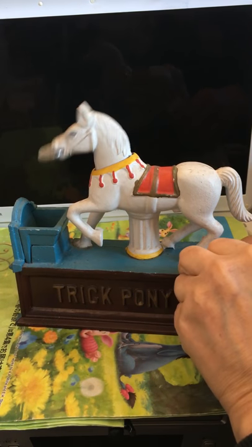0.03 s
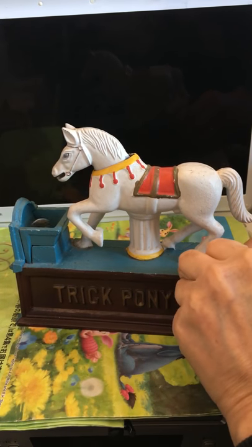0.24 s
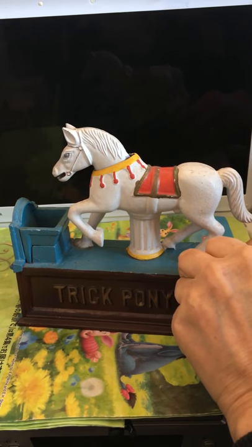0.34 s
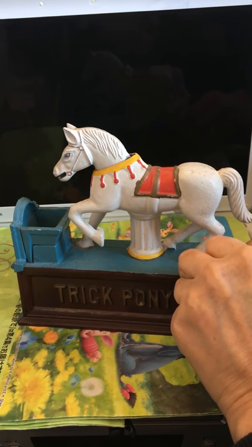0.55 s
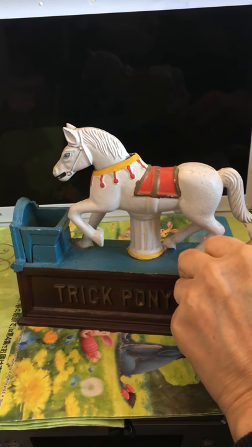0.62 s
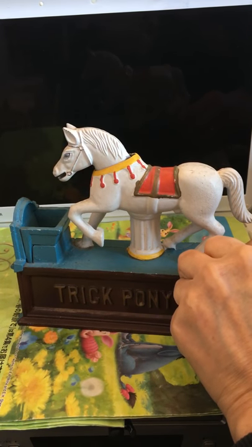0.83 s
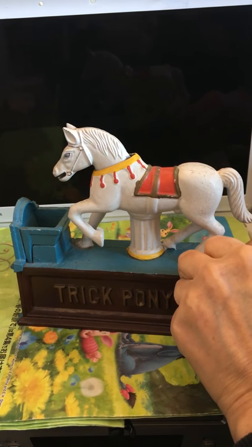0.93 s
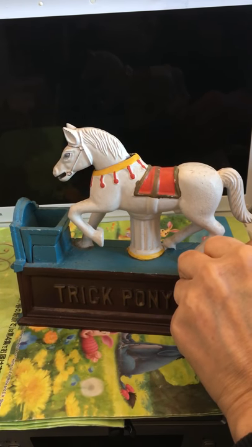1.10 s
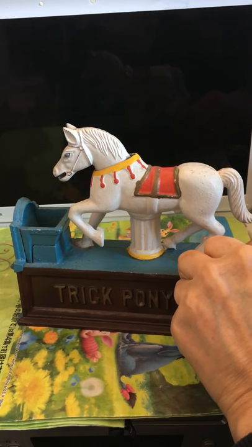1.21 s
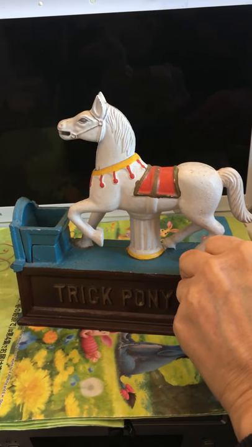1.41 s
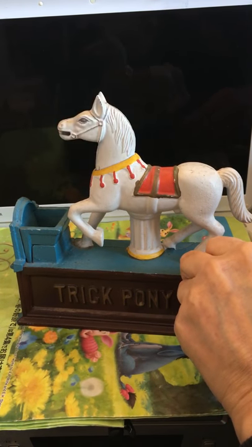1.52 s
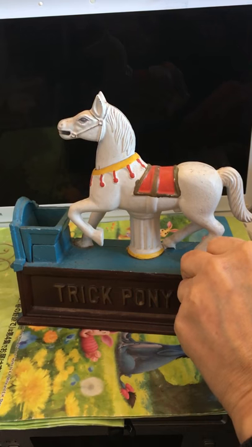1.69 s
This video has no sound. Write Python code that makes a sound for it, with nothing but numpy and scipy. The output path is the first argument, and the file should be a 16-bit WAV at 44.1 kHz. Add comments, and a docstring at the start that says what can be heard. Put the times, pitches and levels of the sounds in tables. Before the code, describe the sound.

A cast-iron mechanical coin bank scrapes and clacks, and a coin rings and rattles down inside. After a pause, the mechanism slams back, leaving a spring ringing. It is heard close up in a quiet room.

```python
"""A cast-iron mechanical coin bank is worked by hand, close by in a quiet, faintly humming room.
First the pony's head scrapes down and clacks against its stop, shaking a spring.
The coin drops, rings and rattles down the chute into the base. A soft rub on the iron fills the pause.
Last, the head scrapes back up and slams home, leaving the spring ringing."""
import sys
import numpy as np
from scipy import signal
from scipy.fft import rfft, irfft
from scipy.io import wavfile
from scipy.ndimage import uniform_filter1d

SR = 44100
rng = np.random.default_rng(int(sys.argv[2]) if len(sys.argv) > 2 else 0)


def wrap_up_sound(samples):
    """Save the sound to the file named by the first command line argument, as 16-bit audio."""
    columns = np.atleast_2d(samples).T
    # keep every value between -1 and 1, then stretch to whole-number steps
    tamed = np.clip(columns, -1, 1)
    steps = np.round(tamed * 32767).astype(np.int16)
    wavfile.write(sys.argv[1], SR, steps)


N = 77175
TIME = np.arange(N) / SR

# A "colour" says how strong a noise is at each pitch. A "mode" is one note that an object rings at.
# t60 is the time a sound takes to fade by 60 dB.
# the room's low rumble: pitch_hz, level_db
RUMBLE_COLOUR = [(15, -40.5), (25, -16.5), (49, -7), (76, -14), (108, -0.5), (127, -19.5), (141, -14),
                 (463, -29.5), (641, -35), (1190, -42), (1290, -24), (1440, -57), (16000, -69)]
# an appliance's hum: pitch_hz, level_db
HUM_TONES = [(54, -64.5), (107, -66.5)]
# iron parts knock together: start_s, level_db, peak_hz, peak_db, casting_ring_db
IRON_CLACKS = [(0.0435, -58, 4460, 11, -62), (0.088, -50, 3200, 16, -55), (0.1178, -49.5, 1490, 15, -51),
               (0.1283, -51.5, 4550, 20, -59), (0.1442, -43, 1000, 25.5, -47.5),
               (0.2176, -25, 1400, 1, -33), (.228, -20, 1400, -24, -27), (.2395, -19.5, 3960, 7.5, -46),
               (0.2548, -14.5, 4940, 10.5, -35), (.375, -43.5, 1204, 12, -45.5),
               (0.414, -44.5, 4150, 9, -51.5), (0.856, -57, 1300, 9, -62), (1.386, -32, 2990, 14, -23),
               (1.4002, -28.5, 2880, -8, -42), (1.458, -24, 1070, 29, -38), (1.466, -15.5, 9100, 6, -21),
               (1.4711, -17.5, 930, 7, -33.5), (1.477, -19.5, 2970, 16.5, -51), (1.49, -53, 6000, -8, -77)]
# the pivot and linkage scrape as the head goes down, then up: time_s, level_db
DOWN_LEVELS = [(.05, -70.5), (.11, -67.5), (.135, -42.5), (.17, -50.5), (.2, -41.5), (.214, -35),
               (.225, -23.5), (.245, -38), (.275, -38.5), (.31, -49.5), (.35, -63.5), (.44, -57)]
UP_LEVELS = [(1.362, -74), (1.375, -48.5), (1.387, -27.5), (1.409, -34), (1.425, -33.5), (1.45, -28),
             (1.47, -25.5), (1.493, -45), (1.519, -50)]
# grit and dense ringing of the iron, down and up: pitch_hz, level_db
DOWN_IRON_COLOUR = [(120, -54.5), (200, -9.5), (366, -25.5), (986, -8), (1140, -8.5), (1270, 1),
                    (1940, -10.5), (3130, -8), (8580, -16), (10700, -25.5), (12800, -16), (16000, -36)]
UP_IRON_COLOUR = [(130, -56.5), (220, -45), (315, -3.5), (549, -24), (601, -10.5), (1250, -2.5), (1890, -5),
                  (2960, -6.5), (3610, -7.5), (6180, -9), (16000, -19.5)]
# notes that the scraping sets off, down and up: pitch_hz, level_db, t60_s
DOWN_MODES = [(360, -12, 0.12), (1288, -3, 0.064), (1536, -6.5, 0.031), (3013, -4.5, 0.036)]
UP_MODES = [(315, -14, 0.24), (393, -10, 0.061), (1346, -0.5, 0.049), (2960, 3, 0.058), (3260, -12, 0.047)]
# modes of the casting (the iron body), spring, chute and coin: pitch_hz
CASTING_PITCHES = [308, 392, 965, 1140, 1295, 1345, 1523, 1660, 1765, 2468, 2893, 3092, 3309, 4555]
SPRING_PITCHES = [1287, 1943, 2261, 2476, 2643]
CHUTE_PITCHES = [4150, 4214, 4250, 4430, 5222, 6146, 6368, 9049, 11680]
COIN_PITCHES = [13168, 13275, 13930, 14076]
# strength and fade of those modes, in the same order: level_db, t60_s
CASTING_MODES = [(-25, .15), (-25, 0.142), (-3.5, 0.025), (-8, 0.035), (-2.5, 0.061), (-2.5, .06),
                 (-9, .08), (-13.5, .06), (-11.5, 0.057), (-15.5, 0.19), (-20, 0.19), (-13, 0.057),
                 (-2, 0.046), (-6, 0.067)]
SPRING_MODES = [(-40.5, 2.4), (-15, 0.49), (-4, 0.41), (-3, 0.26), (-10, 0.18)]
CHUTE_MODES = [(-3, 0.058), (0, 0.033), (-7.5, 0.034), (-11, 0.061), (-12, 0.05), (-3, 0.034), (-18, 0.047),
               (-11.5, 0.0395), (-16.5, 0.0357)]
COIN_MODES = [(-2, 0.099), (-17, 0.061), (-13, 0.21), (1.5, 0.32)]
# the spring is shaken: start_s, level_db
SPRING_SHAKES = [(.228, -38.5), (1.471, -33)]
# the coin strikes: start_s, level_db, peak_hz, peak_db, casting_ring_db, chute_ring_db, coin_ring_db
COIN_BOUNCES = [(0.2707, -16.5, 13200, 8.5, -40, -39, -23), (.288, -14.5, 4460, 7, -26.5, -14, -28),
                (0.3054, -27, 4200, 15, -37, -24, -20.5), (0.451, -18, 8860, 17, -39, -34.5, -33),
                (.479, -29.5, 9000, -4.5, -47.5, -46.5, -30.5), (0.4819, -36, 12000, 7, -45, -39.5, -40.5),
                (.49, -29.5, 4310, 4, -43, -29, -37.5), (0.5162, -24, 5980, -14.5, -39, -17.5, -36.5),
                (0.5248, -30, 12470, 4, -47.5, -35.5, -28.5), (0.558, -31, 5980, -5.5, -64, -27, -42.5),
                (0.568, -21, 7500, -3.5, -43.5, -40, -42.5), (0.5767, -17, 3035, 10.5, -35, -33.5, -26.5),
                (.608, -17, 9550, 14.5, -49, -54, -42.5), (0.6251, -13, 4820, 17, -42.5, -25, -50.5),
                (0.646, -32.5, 5050, -7, -62, -49.5, -45), (0.7024, -44, 4470, 6.5, -50, -50, -74)]
# the clatter of a coin strike: pitch_hz, level_db
BOUNCE_COLOUR = [(180, -65.5), (300, -32.5), (1140, -14), (1410, -14), (3890, -8.5), (4230, -1.5),
                 (7320, -6.5), (9710, -7), (12500, -10.5), (14200, -4.5), (16000, -29)]
# the coin comes to lie against the iron, which chokes its ringing: time_s
CHOKE_TIMES = [.338, .612]
# a soft rub on the casting: time_s, level_db
RUB_LEVELS = [(.905, -65), (.93, -47), (.955, -51.5), (.985, -62), (1.03, -76.5)]
# the grit of that rub: pitch_hz, level_db
RUB_GRIT_COLOUR = [(76, -36), (130, 6), (198, 1.5), (625, -18), (974, -9), (1100, -16), (3750, -10),
                   (4320, -18.5), (9100, -8), (16000, -19)]
# notes that the rub sets off: pitch_hz, level_db, t60_s
RUB_MODES = [(193, -3.5, 0.073), (973, 0.5, 0.067)]
# the microphone's hiss: pitch_hz, level_db
HISS_COLOUR = [(240, -24.5), (400, -4.5), (1290, -10), (1790, -8), (2320, -7.5), (2930, -10.5),
               (8760, -15.5), (16000, -19.5)]


def from_db(db):
    """Turn decibels into a number to multiply by."""
    return 10 ** (np.asarray(db) / 20)


def unit_power(x):
    """Scale a sound to an average power of 1."""
    return x / np.sqrt(np.mean(x ** 2) + 1e-20)


def decay(t60_s, size):
    """A fade that loses 60 dB every t60_s seconds."""
    return np.exp(-np.log(1000) * TIME[:size] / t60_s)


def noise(colour, size=N, peak_hz=1000, peak_db=0, peak_octaves=0.2):
    """Noise of a given colour, with an optional boost around one pitch."""
    hz, db = np.transpose(colour)
    octave = np.log2(np.fft.rfftfreq(size, 1 / SR) + 1)
    shape_db = np.interp(octave, np.log2(hz), db)
    shape_db -= 20 * np.maximum(np.log2(hz[0]) - octave, 0)  # falls away below the lowest pitch
    shape_db += peak_db * np.exp(-.5 * ((octave - np.log2(peak_hz)) / peak_octaves) ** 2)
    return unit_power(irfft(rfft(rng.standard_normal(size)) * from_db(shape_db), size))


def background(rumble_db=-58):
    """Low room rumble and an appliance's hum, there from the start."""
    hum = sum(from_db(db) * np.sqrt(2) * np.sin(2 * np.pi * (hz * TIME + rng.random()))
              for hz, db in HUM_TONES)
    return from_db(rumble_db) * noise(RUMBLE_COLOUR) + hum


def clatter(hits, colour, t60_s, contact_s=0.00048, crack_s=0.00086, size=8192):
    """Each hit is a sharp crack and a burst of so many notes that they blur into noise."""
    out = np.zeros(N + size)
    rise = 1 - np.exp(-TIME[:size] / contact_s)
    crack = 1 + 0.53 * np.exp(-TIME[:size] / crack_s)
    fade = rise * crack * decay(t60_s, size)
    for start_s, db, peak_hz, peak_db in hits:
        start = int(start_s * SR)
        out[start:start + size] += from_db(db) * fade * noise(colour, size, peak_hz, peak_db)
    return out[:N]


def ring(force, hz, t60_s):
    """One mode: each push starts a fading sine wave."""
    shrink = np.exp(-np.log(1000) / (t60_s * SR))
    turn = 2 * np.pi * hz / SR
    return signal.lfilter([0, np.sin(turn)], [1, -2 * shrink * np.cos(turn), shrink ** 2], force + 1e-18)


def struck(pitches, modes, times_s, levels_db, scatter_db=1.5):
    """Every blow rings every mode of an object, each with a slightly different strength."""
    out = np.zeros(N)
    for k, (hz, (db, t60_s)) in enumerate(zip(pitches, modes)):
        blows_db = levels_db + db + scatter_db * rng.standard_normal(len(times_s))
        force = np.zeros(N)
        force[(times_s * SR).astype(int)] = from_db(blows_db)
        out += (-1) ** k * ring(force, hz, t60_s)  # every other mode starts the opposite way
    return out


def friction(levels, colour, modes, ring_db, slips_per_s=1500, spread_db=1.5, bright_from_db=-32.5):
    """Sliding is many tiny slips: they make grit, brighter with effort, and set a few notes ringing."""
    times_s, levels_db = np.transpose(levels)
    gain = from_db(np.interp(TIME, times_s, levels_db)) * (TIME >= times_s[0]) * (TIME <= times_s[-1])
    slips = (rng.random(N) < slips_per_s / SR) * rng.choice([-1, 1], N)
    slips = unit_power(slips * from_db(spread_db * np.minimum(rng.exponential(1, N), 3)))
    slip_power = signal.fftconvolve(slips ** 2, decay(t60_s=0.015, size=2048) ** 2)[:N]
    grit = unit_power(noise(colour) * np.sqrt(np.abs(slip_power)))
    # gentle sliding is dull: it loses treble above 2600 Hz
    dull = unit_power(signal.sosfilt(signal.butter(1, 2600, fs=SR, output="sos"), grit))
    effort = np.clip(gain / from_db(bright_from_db), 0, 1) ** 2
    grit = effort * grit + (1 - effort) * dull
    body = sum(from_db(db) * np.cos(2 * np.pi * hz * TIME) * decay(t60_s, N) for hz, db, t60_s in modes)
    singing = signal.fftconvolve(slips * gain, body / np.linalg.norm(body))[:N]
    return (gain * grit + from_db(ring_db) * singing) / np.hypot(1, from_db(ring_db))


def stroke(clacks, levels, colour, modes, ring_db):
    """One movement of the head: the linkage scrapes and knocks on its stops, ringing the casting."""
    knocks = clatter(clacks[:, :4], colour, t60_s=0.044)
    casting = struck(CASTING_PITCHES, CASTING_MODES, times_s=clacks[:, 0], levels_db=clacks[:, 4])
    return knocks + casting + friction(levels, colour, modes, ring_db)


def head():
    """The pony's head swings down and later comes back up."""
    clacks = np.array(IRON_CLACKS)
    returning = clacks[:, 0] > UP_LEVELS[0][0]
    down = stroke(clacks[~returning], DOWN_LEVELS, DOWN_IRON_COLOUR, DOWN_MODES, ring_db=-1.5)
    up = stroke(clacks[returning], UP_LEVELS, UP_IRON_COLOUR, UP_MODES, ring_db=-2)
    return down + up


def spring():
    """Both strokes of the head shake the spring, which rings on."""
    return struck(SPRING_PITCHES, SPRING_MODES, *np.transpose(SPRING_SHAKES))


def coin(tumble_hz=50, tumble_depth=0.37, choke_t60_s=0.05):
    """The coin bounces down, ringing the casting, the chute and itself; lying on the iron chokes it."""
    bounces = np.array(COIN_BOUNCES)
    times_s, _, _, _, casting_db, chute_db, coin_db = bounces.T
    rings = struck(CASTING_PITCHES, CASTING_MODES, times_s, casting_db)
    rings += struck(CHUTE_PITCHES, CHUTE_MODES, times_s, chute_db)
    # the coin's ring throbs as its faces turn to and from the listener
    tumbling_s = np.maximum(TIME - CHOKE_TIMES[0], 0)
    throb = 1 + tumble_depth * np.sin(2 * np.pi * tumble_hz * tumbling_s)
    for start_s, end_s in zip([0] + CHOKE_TIMES, CHOKE_TIMES + [N / SR]):
        between = (times_s >= start_s) & (times_s < end_s)
        choke = np.exp(-np.log(1000) * np.maximum(TIME - end_s, 0) / choke_t60_s)
        rings += struck(COIN_PITCHES, COIN_MODES, times_s[between], coin_db[between]) * choke * throb
    return clatter(bounces[:, :4], BOUNCE_COLOUR, t60_s=0.04) + rings


def rub():
    """Something slides softly on the casting during the pause."""
    return friction(RUB_LEVELS, RUB_GRIT_COLOUR, RUB_MODES, ring_db=-2.5)


def room(sound, level_db=-13, t60_s=0.12, delay_s=0.0071, top_hz=14000, size=22050):
    """The walls send back a short, slightly dull echo."""
    tail = rng.standard_normal(size) * decay(t60_s, size) * (TIME[:size] > delay_s)
    tail = signal.sosfilt(signal.butter(2, top_hz, fs=SR, output="sos"), tail / np.linalg.norm(tail))
    return from_db(level_db) * signal.fftconvolve(sound, tail)[:N]


def scene(low_cut_hz=260):
    """The bank, with its bass below about 260 Hz cut away, in its room."""
    low_cut = signal.butter(4, low_cut_hz, "high", fs=SR, output="sos")
    bank = signal.sosfilt(low_cut, head() + spring() + coin()) + rub()
    return (bank + room(bank) + background())[None]


def record(dry, hiss_db=-61, loud_db=-40.5, hold_s=0.376, shut_db=-13.5, top_hz=15900):
    """A noise gate turns the microphone's hiss down except just after loud sounds; the top is cut."""
    quiet = uniform_filter1d(dry[0] ** 2, size=256) < from_db(loud_db) ** 2
    since_loud_s = TIME - np.maximum.accumulate(np.where(quiet, -1, TIME))
    gate = uniform_filter1d(np.where(since_loud_s < hold_s, 1., from_db(shut_db)), size=256)
    mic = dry + from_db(hiss_db) * gate * noise(HISS_COLOUR)
    return signal.sosfilt(signal.ellip(12, .1, 80, top_hz, fs=SR, output="sos"), mic)


dry = scene()
out = record(dry)
wrap_up_sound(out)
```